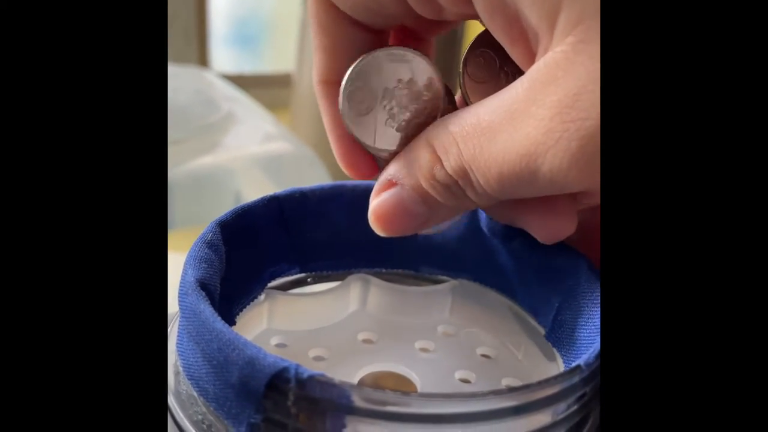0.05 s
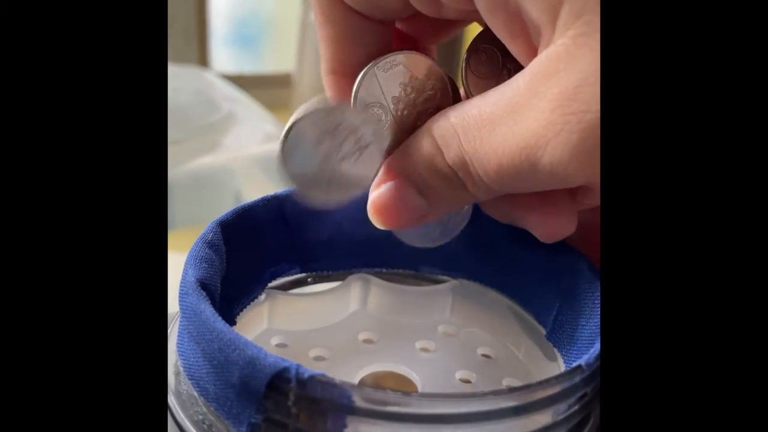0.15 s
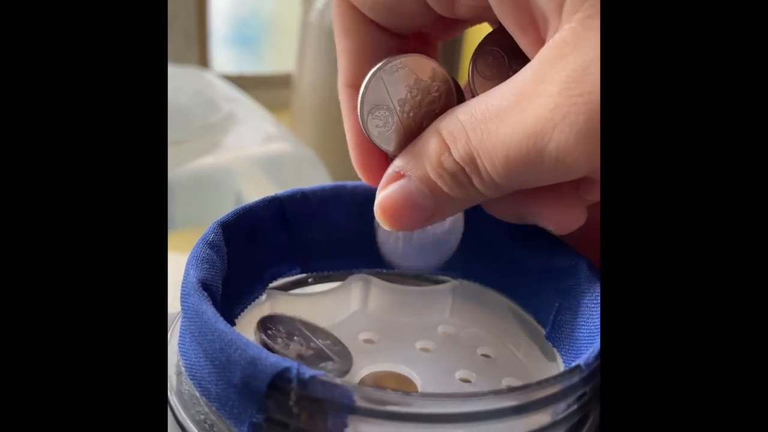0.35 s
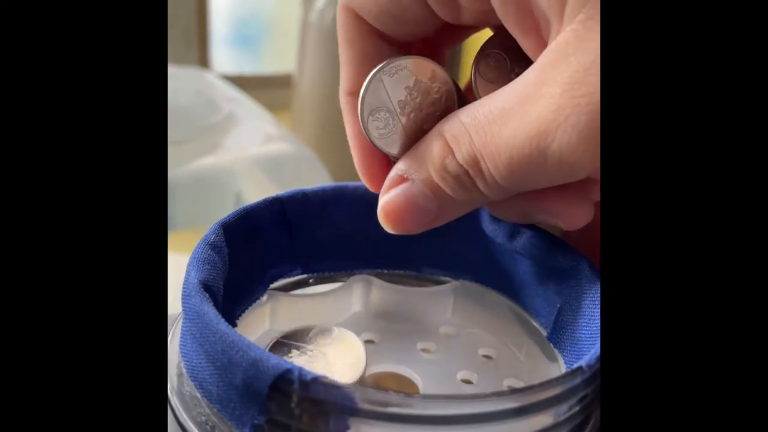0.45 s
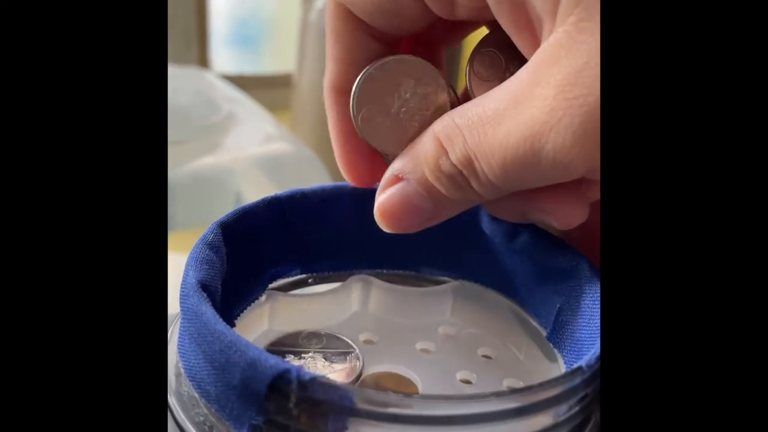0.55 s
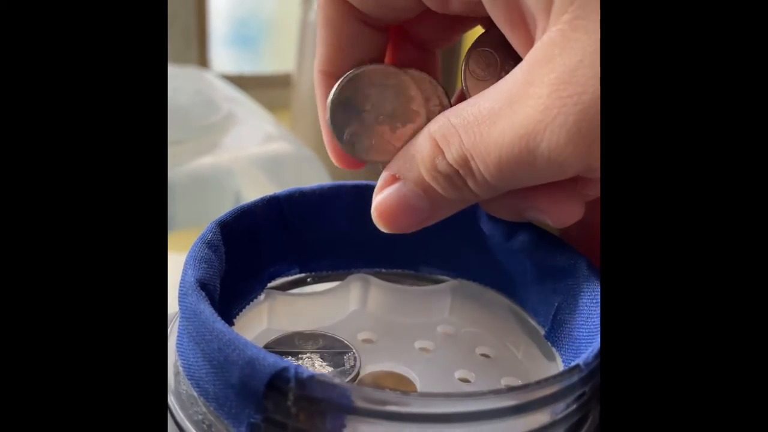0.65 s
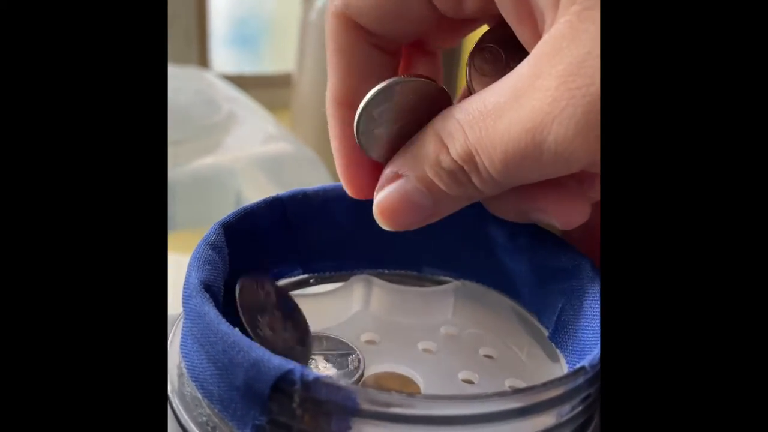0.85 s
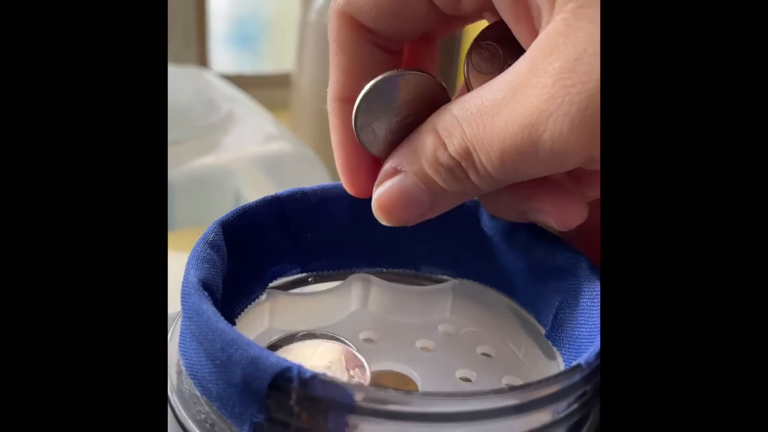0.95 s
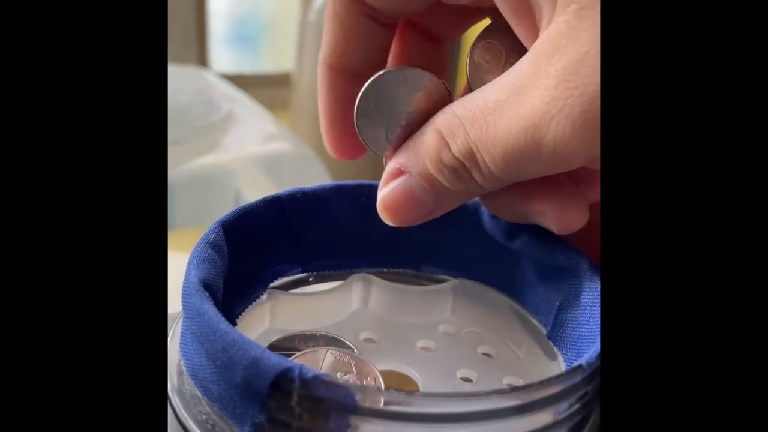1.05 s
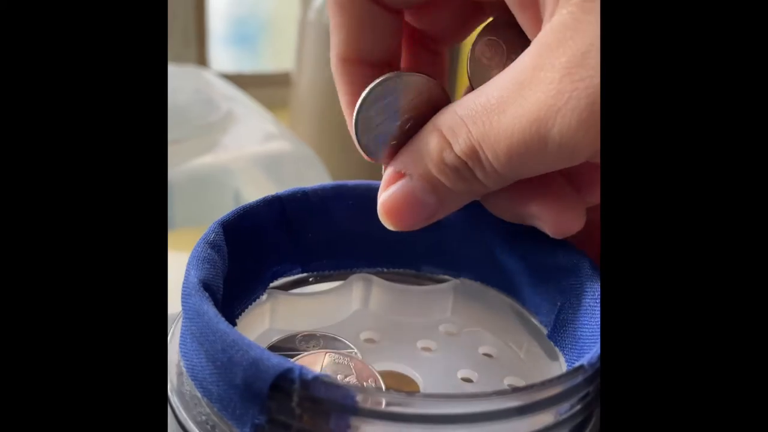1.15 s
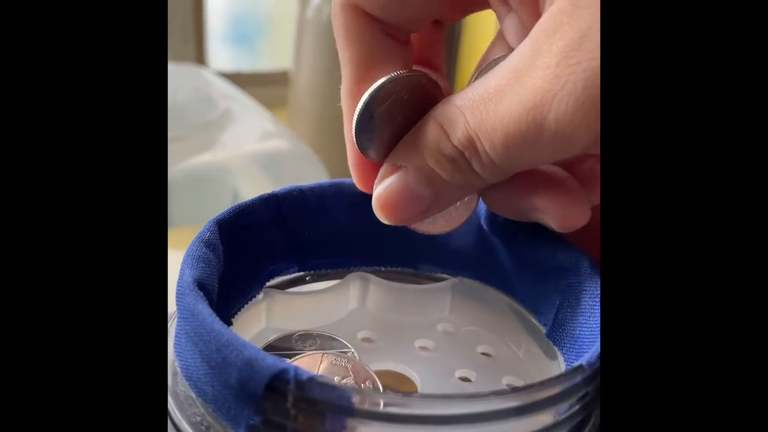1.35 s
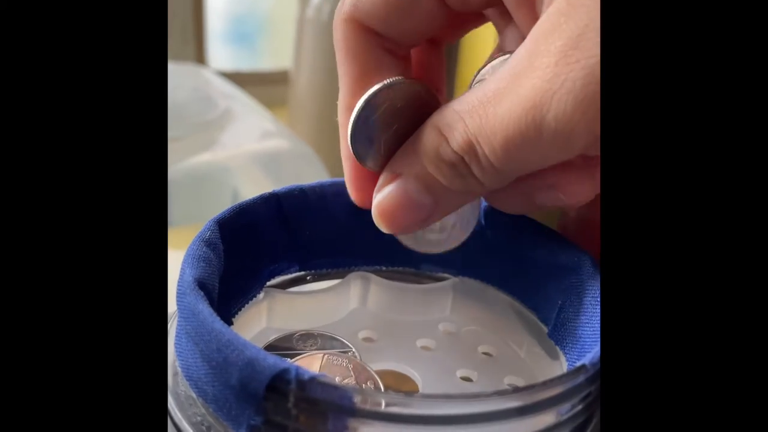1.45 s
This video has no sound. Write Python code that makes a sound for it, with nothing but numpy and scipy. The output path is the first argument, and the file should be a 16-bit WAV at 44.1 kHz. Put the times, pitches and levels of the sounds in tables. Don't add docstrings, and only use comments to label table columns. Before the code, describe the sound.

Metal coins drop one after another onto a thin plastic tray, clacking, bouncing and rattling to rest

```python
import sys
import numpy as np
from scipy import signal
from scipy.fft import rfft, irfft, next_fast_len
from scipy.io import wavfile

SR = 44100
rng = np.random.default_rng(int(sys.argv[2]) if len(sys.argv) > 2 else 0)


def store_pcm(level_fs):
    pcm = np.round(np.clip(level_fs, -1, 1) * 32767).astype(np.int16)
    wavfile.write(sys.argv[1], SR, np.atleast_2d(pcm).T)


def gain_from_db(level_db):
    decades = np.asarray(level_db, float) / 20
    return 10 ** decades


N = 66150

# (time [s], level [dB])
HUM = [(0.0, -46.5), (0.032, -46), (0.396, -48.5), (0.634, -45.5), (0.688, -80), (0.738, -70),
       (0.814, -52.5), (1.47, -49), (1.5, -49)]
# (time [s], level [dB])
HUM_OCTAVE = [(0, -63.5), (1.0, -64), (1.08, -57), (1.5, -54.5)]
# (frequency [Hz], density [dB per Hz])
HISS = [(60, -11), (300, -5), (550, -3.5), (1400, -10.5), (2700, -12), (5500, -23.5), (12500, -34),
        (16000, -60)]
# (frequency [Hz], share [0-1])
HISS_LIKENESS = [(200, 0.78), (600, 0.33), (3000, 0), (4500, 0), (7000, 1), (15000, .93)]
# (frequency [Hz], phase [half turns])
PORT_PHASE = [(0, 0), (1200, -.3), (2000, .15), (4800, 0), (7000, .93), (8300, 1.1), (10900, 2),
              (13600, 2.9), (15100, 3.1), (16200, 4)]
# (frequency [Hz], level [dB])
PORT_BALANCE = [(60, 5), (180, 1.0), (550, 2.5), (1650, 2), (4970, 0.5), (15000, 2.5)]
# (time [s], peak [dB])
TICKS = [
    (0.0993, -45.5),
    (0.123, -38),
    (0.2013, -40.5),
    (0.7444, -40),
    (1.1518, -42),
    (1.4716, -43.5),
]
# (peak time [s], rise [s], fall [s], level [dB], brightness [dB])
WOBBLES = [(0.242, 0.0027, 0.025, -27.5, -6.5), (0.333, 0.01, 0.0046, -37.5, -48),
           (0.364, 0.0058, 0.0086, -22, -0.5), (0.436, 0.016, 0.015, -26, -9.5),
           (.503, .015, 0.029, -34.5, -3.5), (0.558, 0.0082, 0.006, -32.5, 0.5),
           (0.596, 0.013, 0.013, -26, -9.5), (.627, 0.0052, 0.006, -33, 19.5),
           (.66, 0.0067, 0.032, -64, 20.5), (0.698, 0.013, 0.019, -54, 16.5),
           (0.745, 0.0041, 0.023, -53.5, 10.5), (0.776, 0.0076, 0.005, -52.5, 9),
           (0.818, 0.016, 0.015, -35.5, -4), (0.906, 0.03, 0.026, -36.5, -4.5),
           (0.952, 0.0033, 0.0063, -30, 8), (0.976, 0.004, 0.024, -32, -4),
           (1.003, 0.0091, 0.0073, -54.5, 9), (1.125, 0.018, 0.027, -46.5, -8)]
# (time [s], crack [dB], tray ring [dB], clack [dB], jar boom [dB])
HITS = [(0.2481, -16.5, -7, -9, -29), (0.342, -15, -19.5, -19.5, -65), (0.3556, -11.5, -16.5, -12, -34.5),
        (0.404, -26, -15.5, -22.5, -45), (0.4354, -24, -39, -24, -51), (0.4975, -28, -28, -29, -61),
        (0.5512, -23.5, -25.5, -23.5, -73), (0.5916, -29, -30, -42, -38), (0.6225, -27, -38, -17.5, -25),
        (0.6277, -28, -25, -26, -33), (0.8055, -18.5, -9.5, -15, -31.5), (0.879, -21, -15.5, -17, -27.5),
        (0.9484, -17, -25, -24.5, -66), (0.9841, -22, -39, -36, -33), (1.0975, -36, -32.5, -32.5, -40),
        (1.1175, -30.5, -47, -54, -56)]
# (time [s], level [dB], push length [s])
SLAPS = [
    (.6295, -17, .001),
    (.640, -27, .002),
    (.272, -40, .003),
]
# (frequency [Hz], level [dB])
CRACK = [(1200, -56), (3200, -8), (5800, 5.5), (7500, 2.5), (11000, -0.5), (14000, -1), (15600, -14),
         (17000, -43)]
# (frequency [Hz], level [dB], t60 [s])
RING = [(791, 0, .06), (745, -14, .03), (920, -6, .04), (1040, -14, .03), (1150, -16, .03), (600, -28, .03),
        (380, -17, .04), (825, -12, .03)]
# (frequency [Hz], level [dB], t60 [s])
CLACK = [(1408, -9, 0.043), (1545, -1.5, 0.017), (1667, -2.5, 0.017), (1827, 0, 0.01), (2006, -0.5, 0.034),
         (2122, 1.5, 0.029), (2333, -7.5, 0.019), (2407, -2.5, 0.028), (2672, -9.5, 0.063),
         (2733, 4, 0.016), (2955, -9.5, 0.038), (3232, -9.5, 0.045), (3611, -9.5, 0.036), (4320, -3, 0.011)]
# (frequency [Hz], level [dB], t60 [s])
BOOM = [(237, 0, .37), (246, -10, .08)]
# (frequency [Hz], level [dB])
TRAY_LOW_CUT = [(40, -30), (200, 0)]
# (frequency [Hz], level [dB])
CLACK_LOW_CUT = [(500, -18), (1250, 0)]

CRACK_T60_S = 0.006
CLACK_APART_DB = -3


def rms_one(x):
    return x / np.sqrt(np.mean(x ** 2) + 1e-20)


def at_hz(points, hz):
    f, v = np.transpose(points)
    return np.interp(np.log(hz + 1), np.log(f + 1), v)


def colour(x, points):
    hz = np.arange(N // 2 + 1) * SR / N
    return irfft(rfft(x) * gain_from_db(at_hz(points, hz)), N)


def ports(x):
    size = next_fast_len(N + 4096)
    hz = np.arange(size // 2 + 1) * SR / size
    lead = np.exp(0.5j * np.pi * np.interp(hz, *np.transpose(PORT_PHASE)))
    left = lead * gain_from_db(at_hz(PORT_BALANCE, hz) / 2)
    spectrum = rfft(x, size)
    return np.array([irfft(spectrum * g, size)[:N] for g in (left, 1 / left)])


def background():
    hum_hz, waver_db, hiss_db, hiss_follows = 60.6, -2.5, -51, 0.21
    t = np.arange(N) / SR
    hum_db = np.interp(t, *np.transpose(HUM))
    octave_db = np.interp(t, *np.transpose(HUM_OCTAVE))
    waver = np.interp(t, np.arange(40) * 0.04, rng.standard_normal(40))
    low = gain_from_db(hum_db + waver_db * waver) * np.sin(2 * np.pi * hum_hz * t)
    octave = gain_from_db(octave_db) * np.sin(4 * np.pi * hum_hz * t + 1)
    hum = np.sqrt(2) * (low + octave)

    hz = np.arange(N // 2 + 1) * SR / N
    alike = np.clip(at_hz(HISS_LIKENESS, hz), 0, 1)
    shared, left, right = rfft(rng.standard_normal((3, N))) * gain_from_db(at_hz(HISS, hz))
    hiss = ports(irfft(shared * np.sqrt(alike), N))
    hiss = hiss + irfft(np.array([left, right]) * np.sqrt(1 - alike), N)
    hiss_level = gain_from_db(hiss_db + hiss_follows * (hum_db - hum_db.max()))
    return hum + hiss_level * hiss / np.std(hiss.mean(axis=0))


def crack(times, level_db):
    contact_s, tail_t60_s, tail_db = 0.0012, 0.045, -20
    t, shape = np.arange(N) / SR, np.zeros(N)
    for s, db in zip(times, level_db):
        after = np.maximum(t - s - contact_s, 0)
        fade = gain_from_db(-60 * after / CRACK_T60_S) + gain_from_db(tail_db - 60 * after / tail_t60_s)
        shape += (t >= s) * gain_from_db(db) * fade
    return colour(shape * rng.standard_normal(N), CRACK)


def finger_ticks():
    times, db = np.transpose(TICKS)
    return crack(times, db - 3.5)


def ring(drive, hz, t60):
    r, w = gain_from_db(-60 / (t60 * SR)), 2 * np.pi * hz / SR
    return signal.lfilter([0, np.sin(w)], [1, -2 * r * np.cos(w), r * r], drive + 1e-18)


def shaken_modes(modes, clicks, swell):
    shaken = [clicks * rng.standard_normal(N) for _ in modes]
    steady, swelling = np.zeros(N), np.zeros(N)
    for c, (hz, db, t60) in zip(shaken, modes):
        steady += gain_from_db(db) * ring(c, hz, t60)
        swelling += gain_from_db(db) * ring(c * swell, hz, t60)
    return swelling / np.std(steady)


def wobbles():
    clicks_per_s, uneven_db, slide_share = 1300, 0.5, 1
    crack_db, boom_db = -5, -24
    t, dull, bright = np.arange(N) / SR, np.zeros(N), np.zeros(N)
    for s, rise, fall, db, bright_db in WOBBLES:
        swell = gain_from_db(db) * np.exp(-np.where(t < s, ((s - t) / rise) ** 2, (t - s) / fall))
        dull += swell
        bright += swell * gain_from_db(bright_db)
    middle = np.sqrt(dull * bright)
    click_sizes = gain_from_db(uneven_db * np.minimum(rng.exponential(1, N), 4))
    clicks = (rng.random(N) < clicks_per_s / SR) * click_sizes

    near = shaken_modes(RING, clicks, dull)
    near += gain_from_db(boom_db) * shaken_modes(BOOM, clicks, dull)
    near += shaken_modes(CLACK, clicks, middle)
    apart = gain_from_db(CLACK_APART_DB) * shaken_modes(CLACK, clicks, middle)
    bursts = rms_one(signal.lfilter([1], [1, -gain_from_db(-60 / (CRACK_T60_S * SR))], clicks))
    grit = rms_one((slide_share + bursts) * rng.standard_normal(N))
    return near + gain_from_db(crack_db) * colour(grit * bright, CRACK), apart


def strike(modes, times, level_db, contact_s):
    scatter_db = 2.0
    out, touches = np.zeros(N), rng.random((len(times), 5))
    delay_s = contact_s * touches * [0, 1, 1, 1, 1]
    where = np.clip(((np.array(times)[:, None] + delay_s) * SR).astype(int), 0, N - 1)
    for hz, db, t60 in modes:
        draw = rng.standard_normal((len(times), 6))
        strength_db, push = scatter_db * draw[:, 0], draw[:, 1:]
        together = np.abs(np.sum(push * np.exp(2j * np.pi * hz * where / SR), axis=1))
        together += 0.3 * np.abs(push).sum(axis=1)
        drive = np.zeros(N)
        np.add.at(drive, where, (gain_from_db(level_db + db + strength_db) / together)[:, None] * push)
        soft = np.hanning(int(SR / hz / 2) + 3)
        out += ring(signal.lfilter(soft / soft.sum(), [1], drive), hz, t60)
    return out


def landings():
    times, crack_db, ring_db, clack_db, boom_db = np.transpose(HITS)
    clack_db, clack_contact_s = clack_db - 1.5, 0.0018
    near = crack(times, crack_db - 4.5)
    near += colour(strike(CLACK, times, clack_db, clack_contact_s), CLACK_LOW_CUT)
    near += strike(RING, times + 0.002017, ring_db + 5.5, 0.003125)
    near += strike(BOOM, times + 0.00462, boom_db + 6, 0.0027)
    return near, strike(CLACK, times, clack_db + CLACK_APART_DB, clack_contact_s)


def slaps():
    t, out = np.arange(N) / SR, np.zeros(N)
    for k, (s, db, length_s) in enumerate(SLAPS):
        x = ((t - s) / length_s) ** 2
        out += (-1) ** k * gain_from_db(db) * (1 - 2 * x) * np.exp(-x)
    return out


def room(x):
    t60_s, wall_cut_hz = 0.14, 4700
    size = next_fast_len(2 * N)
    w = 2 * np.pi * np.arange(size // 2 + 1) / size
    dull = 1 / (1 + 1j * w * SR / (2 * np.pi * wall_cut_hz))
    spectrum, sides = rfft(x, size), []
    for lags in rng.uniform(0.004, 0.025, (2, 6)) * SR:
        loops = [gain_from_db(-60 * d / SR / t60_s) * dull * np.exp(-1j * w * d) for d in lags]
        echoes = sum(g / (1 - g) for g in loops)
        sides.append(irfft(spectrum * echoes, size)[:N])
    return np.array(sides)


def bass_duck(x):
    edge_hz, follows = 356, 1
    hum_db = np.interp(np.arange(N) / SR, *np.transpose(HUM))
    bass = colour(x, [(edge_hz, 0), (2 * edge_hz, -30)])
    return x - bass * (1 - gain_from_db(follows * np.minimum(hum_db - np.median(hum_db), 0)))


def scene():
    bed = background()
    ticks = finger_ticks()
    wobble, wobble_apart = wobbles()
    landing, landing_apart = landings()
    near = bass_duck(colour(ticks + landing, TRAY_LOW_CUT) + slaps() + wobble)
    apart = colour(landing_apart + wobble_apart, [(300, -26), (1000, 1)]) * [[1], [-1]]
    echoes = gain_from_db(-18) * colour(room(near), [(100, -31), (500, 1.5)])
    return ports(near) + apart + echoes + bed


def roll_off(x):
    return signal.sosfilt(signal.butter(12, 17140, fs=SR, output="sos"), x)


def record(dry):
    peak_top = 0.8
    mix = peak_top * np.tanh(dry / peak_top)
    return roll_off(mix)


dry = scene()
out = record(dry)
store_pcm(out)
```